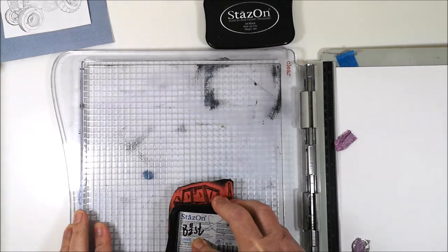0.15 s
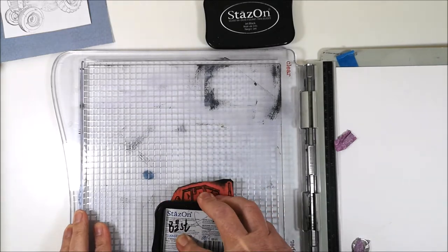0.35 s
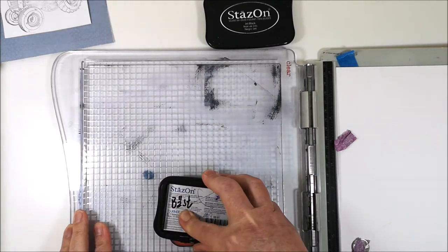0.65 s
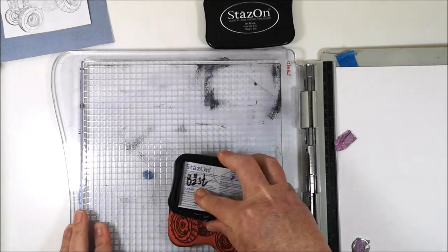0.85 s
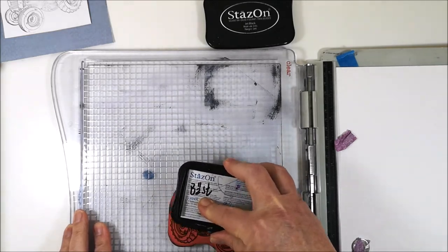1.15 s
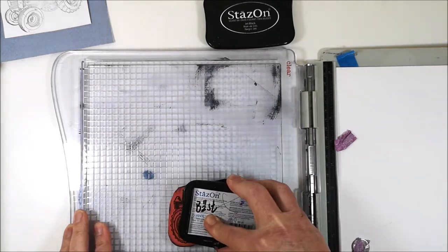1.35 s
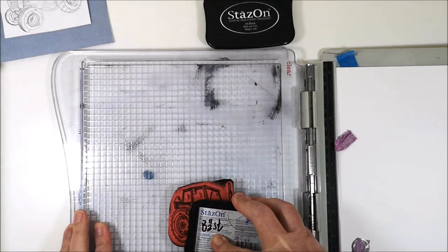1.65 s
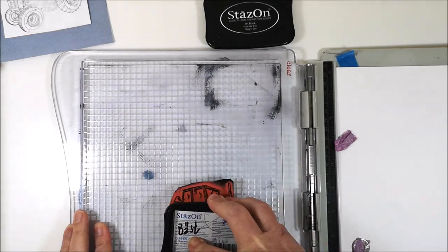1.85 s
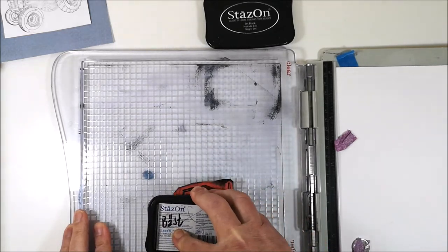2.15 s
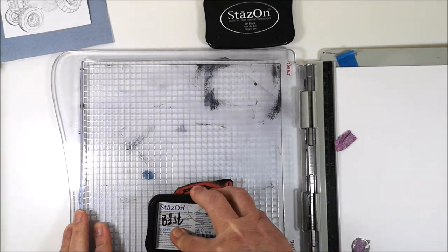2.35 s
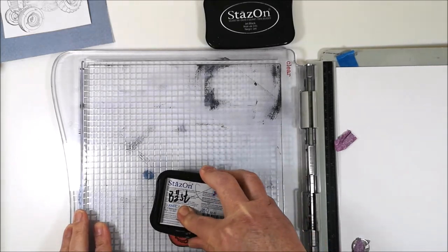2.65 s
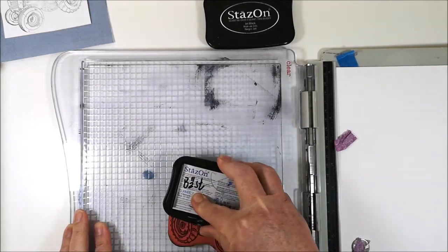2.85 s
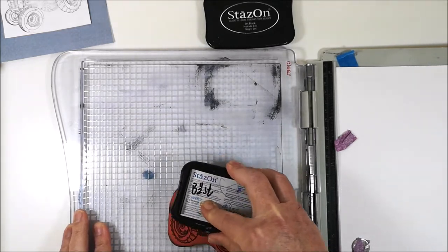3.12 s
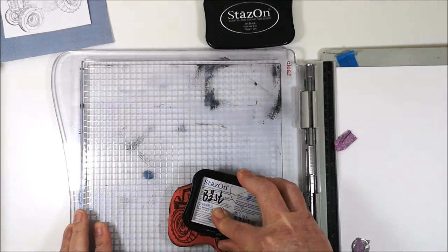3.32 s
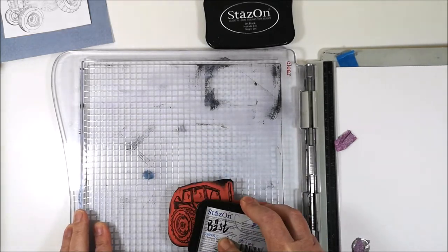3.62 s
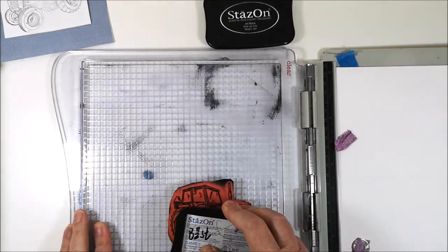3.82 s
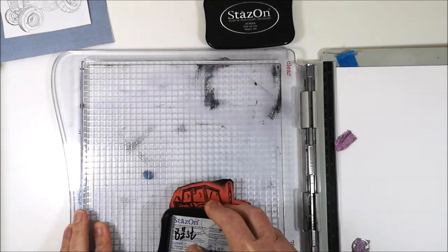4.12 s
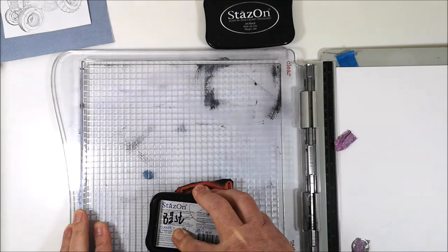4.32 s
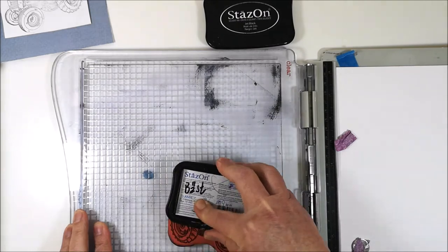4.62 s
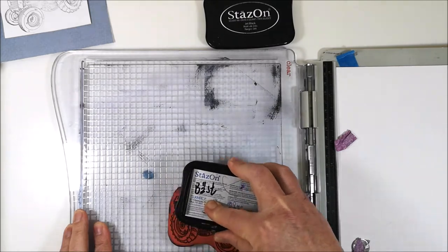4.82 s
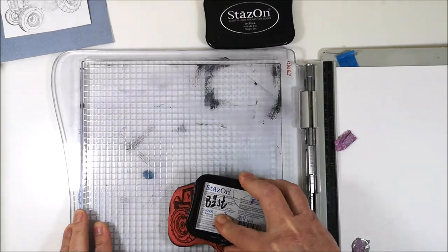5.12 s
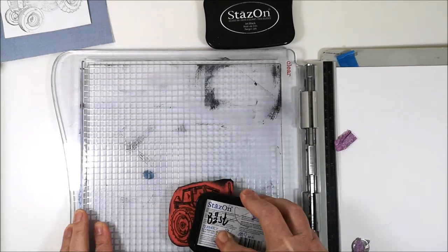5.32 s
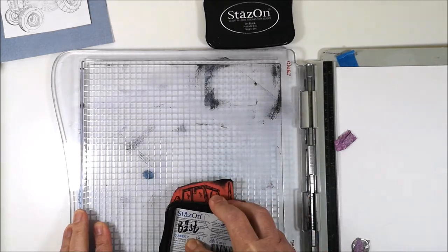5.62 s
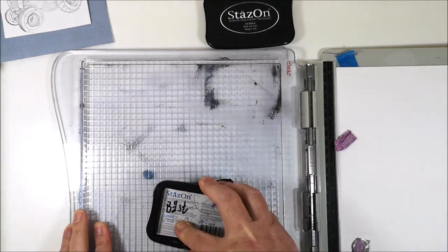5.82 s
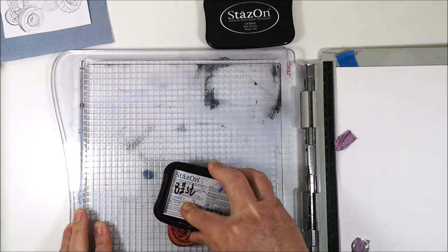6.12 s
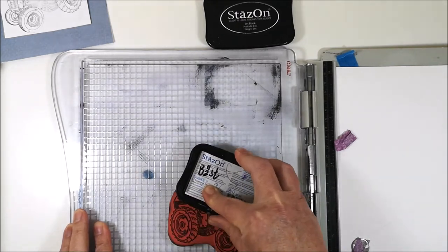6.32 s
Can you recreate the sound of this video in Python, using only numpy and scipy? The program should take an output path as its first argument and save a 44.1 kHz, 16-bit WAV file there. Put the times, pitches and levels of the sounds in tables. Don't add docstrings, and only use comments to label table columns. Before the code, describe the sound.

In a small quiet room, a plastic-cased felt pad taps a rubber stamp in regular rhythm. The first knock and one at two seconds are loudest; others range from barely touching to firm clacks. The tabletop booms softly underneath, with a tiny air pop, sticky ticks and occasional felt drag. Close stereo microphones also catch faint low hum.

```python
import sys
import numpy as np
from scipy import signal
from scipy.fft import rfft, irfft, next_fast_len
from scipy.io import wavfile
from scipy.ndimage import uniform_filter1d, map_coordinates

SR = 44100
rng = np.random.default_rng(int(sys.argv[2]) if len(sys.argv) > 2 else 0)


def linear_from_db(decibels):
    return 10 ** (np.asarray(decibels, float) / 20)


def store_wav(level_fs):
    pcm = np.round(np.clip(np.atleast_2d(level_fs), -1, 1) * 32767)
    wavfile.write(sys.argv[1], SR, pcm.T.astype(np.int16))


N = 284886

# f/Hz, rms level/dB
HUM = [(48.5, -54), (98, -57), (147, -72)]
# f/Hz, density/dB
AIR = [(12, -45.5), (30, -7), (50, -10.5), (75, -14.5), (115, -6.5), (150, -38), (250, -30), (450, -31.5),
       (650, -40.5), (1300, -39), (2200, -35), (2900, -42), (8000, -50), (15600, -58)]
# f/Hz, likeness/1
LIKENESS = [(30, 1), (200, 0.95), (600, 0.094), (2000, 0.15), (12000, .05)]
# f/Hz, t60/s
ROOM_DECAY = [(60, 0.92), (200, 0.37), (500, 0.34), (1500, 0.39), (4000, 0.4), (9000, 0.35)]
# f/Hz, level/dB
ROOM_LEVEL = [(60, -17), (250, -3.5), (500, 0), (1500, -9.5), (4000, -1.5), (9000, -5)]
# f/Hz, level/dB
MIC_RESPONSE = [(20, 2), (8600, 1.5), (9000, -5), (10200, -9.5), (10800, -24), (16000, -14.5)]

# t/s, hold/s, level/dB
RUBS = [
    (.001, 0.062, -56.5),
    (4.097, 0.11, -57),
    (4.617, 0.018, -69),
    (6.076, 0.1, -67),
]
# f/Hz, width/Hz, level/dB
FELT_MODES = [(2130, 900, 2.5), (3400, 500, -0.5), (4270, 250, -0.5), (5100, 330, 1), (5780, 760, -9),
              (7900, 450, -2.5), (11200, 2000, -18.5)]
# t/s, level/dB, f/Hz, t60/s
POPS = [
    (.687, -46, 2680, .025),
    (2.3575, -31, 2200, .04),
    (2.412, -48, 1900, .03),
]
# t/s, crisp level/dB, dull part relative to clack drive/dB
TEARS = [(1.5483, -57, -4), (2.2152, -56.5, 7), (2.5167, -60, 2), (3.1852, -56.5, 0), (4.2555, -53, -10.5),
         (4.351, -92.5, 15), (4.567, -60, -1), (5.587, -59.5, 0), (5.88, -59, -2.5)]

# t/s, plate level/dB, upper plate modes/dB, table level/dB, plate t60/s
DABS = [(.092, -20.5, -3, -32, 0.11), (.389, -45.5, -2.5, -39.5, 0.12), (.689, -30.5, -3, -46, 0.072),
        (1.002, -26, -19.5, -39, 0.083), (1.353, -27, -10, -36.5, 0.084), (1.678, -28, 1, -36.5, 0.064),
        (2.019, -17.5, -14, -34, 0.086), (2.326, -41.5, 3.5, -39, .081), (2.642, -27, -8.5, -42, 0.052),
        (2.967, -29, -12, -41.5, 0.081), (3.323, -28.5, -6.5, -39, 0.1), (3.682, -26, -6.5, -35, 0.15),
        (4.048, -19.5, -2.5, -35, 0.059), (4.389, -31.5, -7, -34, 0.056), (4.709, -22.5, -4, -35.5, 0.047),
        (5.037, -23, -11.5, -39.5, 0.069), (5.359, -35.5, -2, -39.5, 0.045), (5.707, -24.5, -6, -39, 0.076),
        (6.047, -32, -5, -40, 0.045), (6.385, -32, -11, -37.5, 0.082)]
# f/Hz, level/dB
PLATE_MODES = [(379.7, -3), (399.7, -9), (327, -13)]
# f/Hz, level/dB
EDGE_MODES = [(463, 0), (520, -8), (590, -16.5)]
# f/Hz, level/dB, t60/s
LEG_MODES = [(27.4, 0, 0.25), (36.9, -4.5, 0.56), (45, -6, 0.53), (62, 0, 0.3), (81.2, -2.5, .4)]
# f/Hz, level/dB, t60/s
TABLE_MODES = [(101.7, 2, 0.28), (125.5, 2, 0.27), (173.6, -5, 0.25), (230.3, -4.5, 0.16),
               (276, -11.5, 0.25)]

# t/s, clack level/dB, rattle t60/s, crisp edge/dB, edge left-right/dB
SLAPS = [(.0915, -12.5, 0.066, -24, 5), (0.3937, -35, 0.085, -50, 16.5), (.6868, -40, 0.038, -70, 3),
         (1.002, -22.5, 0.027, -51, -7), (1.3519, -29.5, .12, -30.5, 12.5),
         (1.677, -23.5, 0.083, -57.5, -4), (2.018, -13, .052, -28.5, 13.5),
         (2.3307, -32.5, 0.061, -44, 12.5), (2.645, -47.5, 0.12, -61.5, 6),
         (2.966, -35.5, 0.095, -53.5, 7.5), (3.323, -22.5, 0.041, -36.5, 6), (3.682, -27.5, 0.12, -33.5, 9),
         (4.0435, -20.5, 0.096, -30.5, 11), (4.3888, -26.5, .06, -70, 2), (4.709, -22, 0.054, -35.5, 0.5),
         (5.0378, -26.5, 0.041, -32.5, 11.5), (5.3576, -36.5, 0.058, -53, 1.5),
         (5.705, -23, 0.046, -42.5, 12), (6.05, -30.5, 0.032, -47.5, 10.5), (6.385, -25, 0.064, -42.5, 10)]
# t/s, clack level/dB, knock relative to clack/dB
REBOUNDS = [(.106, -14.5, -7.5), (0.415, -54, 13), (1.391, -41, -12.5), (1.726, -44.5, -1.5),
            (2.342, -52, 0), (3.697, -20.5, -5), (4.058, -33, -6.5), (4.723, -35, -5)]
# f/Hz, width/Hz, level/dB
KNOCK_MODES = [(660, 85, -5.5), (809, 70, 3.5), (963, 110, 3), (1016, 67.6, 4.5), (1155, 48.6, -1.5)]
# f/Hz, width/Hz, level/dB
CLACK_MODES = [(1253, 130, -2.5), (1540, 300, -1.5), (1936, 270, 1), (2164, 472, -2), (2547, 954, -10.5)]
# f/Hz, width/Hz, level/dB
SNAP_MODES = [(4000, 1400, -13), (4930, 200, -5), (5560, 660, -11.5), (7610, 510, -5), (7910, 1900, -10.5),
              (10400, 700, -33.5)]

USUAL_SLAP_DB = -28
LEFT_LEAD = 13


def unit(x):
    return x / np.sqrt(np.mean(x ** 2) + 1e-20)


def along(points, hz):
    f, value = np.transpose(points)
    return np.interp(np.log(hz + 1), np.log(f + 1), value)


def filtered(x, response):
    m = next_fast_len(x.shape[-1] + 8192)
    spectrum = rfft(x, m) * response(np.fft.rfftfreq(m, 1 / SR))
    return irfft(spectrum, m)[..., :x.shape[-1]]


def resonant(x, modes):
    def response(f):
        total = 0
        for k, (centre, width, db) in enumerate(modes):
            damping = 1j * f * width
            total = total + (-1) ** k * linear_from_db(db) * damping / (centre * centre - f * f + damping)
        return total

    power_gain = np.mean(abs(response(np.linspace(0, SR / 2, 4000))) ** 2)
    return filtered(x, response) / np.sqrt(power_gain)


def add(track, s, sound):
    part = track[..., round(s * SR):][..., :sound.shape[-1]]
    part += sound[..., :part.shape[-1]]


def ring(modes, rise, scatter_db, detune=0.0029):
    t = np.arange(SR // 2) / SR
    hz, db, t60 = np.transpose(modes)[:, :, None]
    strength, tuning, phase = rng.standard_normal((3, len(modes), 1))
    decay = linear_from_db(db + scatter_db * strength - 60 * t / t60)
    waves = decay * np.sin(2 * np.pi * hz * (1 + detune * tuning) * t + 0.91 * phase)
    return waves.sum(0) * (1 - np.exp(-t / rise)) ** 2


def burst(rise, t60, spiky, apart, blow=0):
    t = np.arange(SR // 4) / SR
    grit = rng.standard_normal((4, len(t)))
    pair = unit((grit[0] + apart * grit[2:]) * np.exp(spiky * grit[1]))
    pair = pair * (1 - np.exp(-t / rise)) ** 2 * linear_from_db(-60 * t / t60)
    peak = t == t[round(3.5 * rise * SR)]
    pair = pair + blow * peak
    push = np.linalg.norm(pair[0]) * peak
    return np.array([*pair, push])


def spread(pair, spectrum):
    def mid_side(hz):
        angle = np.arccos(np.clip(along(LIKENESS, hz), -1, 1)) / 2
        return linear_from_db(along(spectrum, hz)) * np.array([np.cos(angle), np.sin(angle)])

    mid, side = filtered(pair, mid_side)
    return np.array([mid + side, mid - side])


def room_tone():
    t = np.arange(N) / SR
    knots = rng.standard_normal((3, 40))
    hum_drift, time_drift, air_drift = map_coordinates(knots, [[[0], [1], [2]] + 0 * t, [5 * t, 5 * t, 3 * t]])
    air = linear_from_db(-56 + 0.55 * air_drift) * unit(spread(rng.standard_normal((2, N)), AIR))
    hum = np.zeros(N)
    for hz, db in HUM:
        hum += linear_from_db(db + 2.0 + 0.84 * hum_drift) * np.sin(2 * np.pi * hz * (t + 0.00072 * time_drift))
    return air + hum


def room(x):
    out = np.zeros((2, N))
    edges = [0, *(round((row[0] - .02) * SR) for row in DABS[1:]), N]
    for start, end in zip(edges, edges[1:]):
        noise = rng.standard_normal((2, SR * 3 // 5))
        hz, t, z = signal.stft(noise, SR, nperseg=512)
        decay = linear_from_db(-60 * t / along(ROOM_DECAY, hz)[:, None])
        tail = signal.istft(z * decay, SR, nperseg=512)[1]
        tail = tail / np.linalg.norm(tail[0])
        add(out, start / SR + .004, signal.fftconvolve(x[None, start:end], tail, axes=1))
    return spread(out, ROOM_LEVEL)


def rubs():
    t = np.arange(N) / SR
    drag = np.zeros(N)
    for s, hold, db in RUBS:
        swell = 124 * np.maximum(s - t, 0)
        fade = 110 * np.maximum(t - s - hold, 0)
        drag += linear_from_db(db - swell - fade)
    return drag * resonant(rng.standard_normal((2, N)), FELT_MODES)


def pops():
    out = np.zeros(N)
    for s, db, hz, t60 in POPS:
        modes = [(hz, 0, t60), (1.18 * hz, -7, .5 * t60)]
        add(out, s - .001, linear_from_db(db) * ring(modes, rise=.0004, scatter_db=0))
    return out


def ink_tears():
    clack, snap = np.zeros((2, 3, N))
    for s, db, dull_db in TEARS:
        tear = burst(rise=0.0015, t60=0.026, spiky=0.99, apart=0.97)
        add(snap, s, linear_from_db(db + 2.5) * tear)
        add(clack, s, linear_from_db(db + dull_db + 4.5) * tear)
    return resonant(clack, CLACK_MODES), resonant(snap, SNAP_MODES)


def dabs():
    plate, table = np.zeros((2, N))
    for (s, db, edge_db, table_db, t60), (_, slap_db, *_) in zip(DABS, SLAPS):
        modes = [(hz, level, t60) for hz, level in PLATE_MODES]
        modes += [(hz, level + edge_db, 0.85 * t60) for hz, level in EDGE_MODES]
        legs_db = -34.5 + .28 * (slap_db - USUAL_SLAP_DB)
        add(plate, s - .005, linear_from_db(db + 9.0) * ring(modes, rise=0.0045, scatter_db=4.0))
        add(table, s - .003, linear_from_db(legs_db - 1.5) * ring(LEG_MODES, rise=0.0055, scatter_db=4.0, detune=0.013))
        add(table, s - .003, linear_from_db(table_db + 0.5) * ring(TABLE_MODES, rise=0.0035, scatter_db=1.5, detune=0.017))
    return plate, table


def felt_touches():
    knock, clack = np.zeros((2, 3, N))
    for s, db, *_ in DABS:
        touch = burst(rise=0.0016, t60=0.039, spiky=0.59, apart=1.0)
        add(knock, s - .006, linear_from_db(db - 14.0) * touch)
        add(clack, s - .006, linear_from_db(db - 9) * touch)
    return resonant(knock, KNOCK_MODES) + resonant(clack, CLACK_MODES)


def contacts():
    hits = []
    for s, db, t60, *_ in SLAPS:
        knock_db = -6 - 0.051 * (db - USUAL_SLAP_DB)
        hits.append((s, db, knock_db, t60, .002))
    for s, db, knock_db in REBOUNDS:
        hits.append((s, db, knock_db, 0.03, 0.001101))
    return hits


def case_slaps():
    knock, clack, snap = np.zeros((3, 3, N))
    for s, db, knock_db, t60, rise in contacts():
        rattle = burst(rise, t60, spiky=0.95, apart=1.0, blow=4.3)
        add(knock, s - 2 * rise, linear_from_db(db + knock_db + 1.5) * rattle)
        add(clack, s - 2 * rise, linear_from_db(db - 3.0) * rattle)
    for s, _, _, db, pan_db in SLAPS:
        sides = linear_from_db([[pan_db / 2], [-pan_db / 2], [0]])
        edge = burst(rise=.002, t60=0.025, spiky=0.74, apart=0.85)
        add(snap, s - .002, linear_from_db(db + 3.0) * sides * edge)
    case = resonant(knock, KNOCK_MODES) + resonant(clack, CLACK_MODES)
    return case, resonant(snap, SNAP_MODES)


def scene():
    plate, table = dabs()
    slap_case, slap_snap = case_slaps()
    tear_case, tear_snap = ink_tears()
    case = slap_case + felt_touches() + tear_case
    snap = slap_snap + tear_snap
    ringing = plate * linear_from_db([[.3], [-.3], [-9]]) + pops() * linear_from_db([[0], [0], [-12]])
    rattling = case * linear_from_db([[.4], [-.4], [0]]) + snap * linear_from_db([[.5], [-.5], [.1]])
    left, right, walls = ringing + rattling
    late_right = np.pad(right, (LEFT_LEAD, 0))[:N]
    near = np.array([left, late_right]) + table * linear_from_db([[-.1], [.1]])
    blows = near + room(walls + linear_from_db(3.5) * table)
    heard = filtered(blows, lambda hz: linear_from_db(along(MIC_RESPONSE, hz)))
    return heard + rubs() + room_tone()


def top_cut(x):
    return signal.sosfilt(signal.butter(12, 15760, fs=SR, output="sos"), x)


def record(dry):
    upper = filtered(dry, lambda hz: hz ** 2 / (hz ** 2 + 190 ** 2))
    power = abs(uniform_filter1d(np.mean(upper ** 2, 0), size=1500))
    shut = 1 / (1 + (power / linear_from_db(-110)) ** 3.5)
    mix = dry - (1 - linear_from_db(-4.0)) * shut * upper
    return top_cut(mix)


dry = scene()
out = record(dry)
store_wav(out)
```